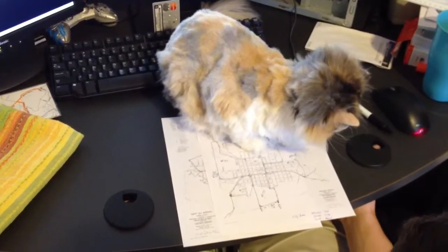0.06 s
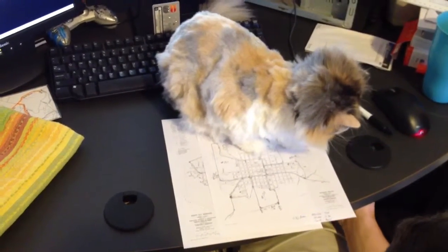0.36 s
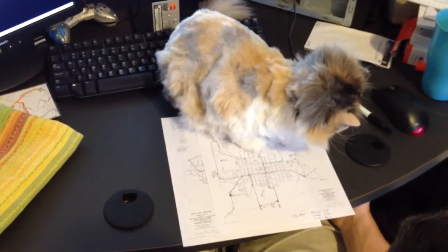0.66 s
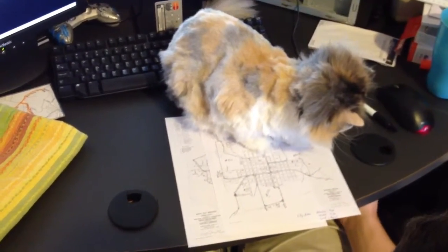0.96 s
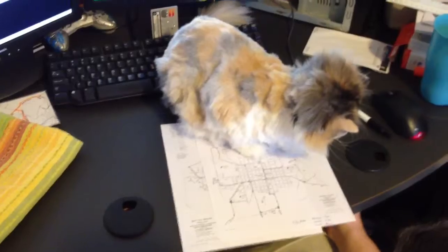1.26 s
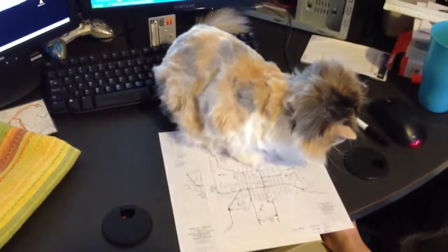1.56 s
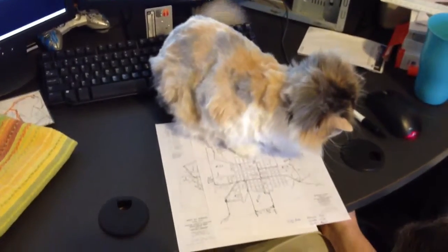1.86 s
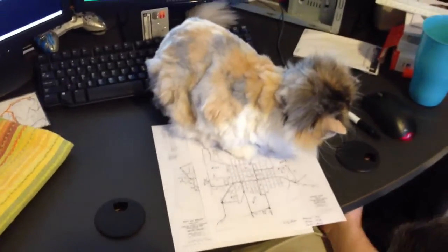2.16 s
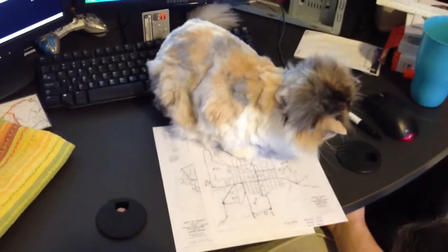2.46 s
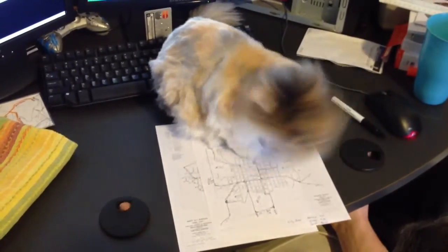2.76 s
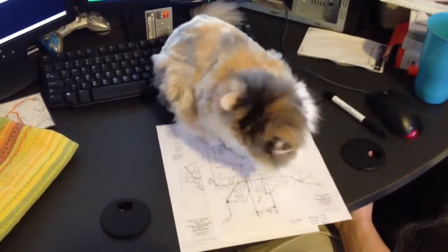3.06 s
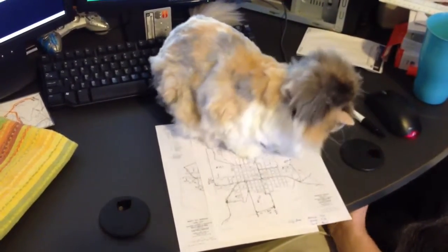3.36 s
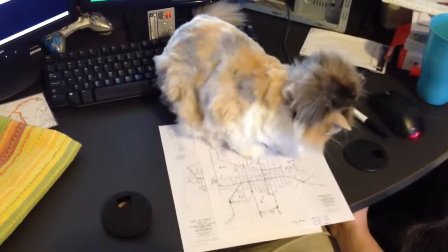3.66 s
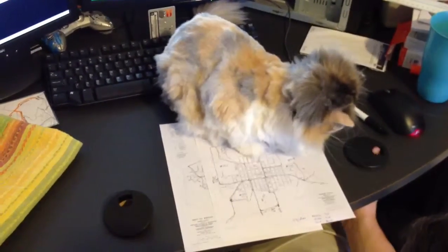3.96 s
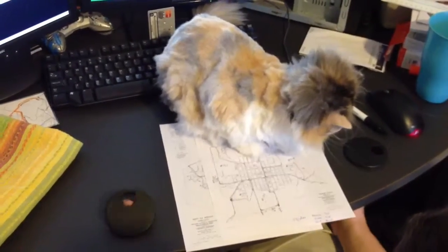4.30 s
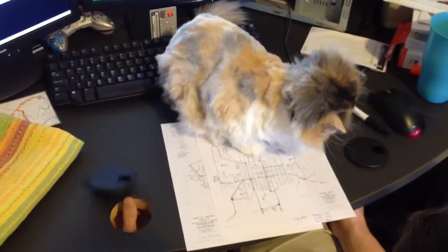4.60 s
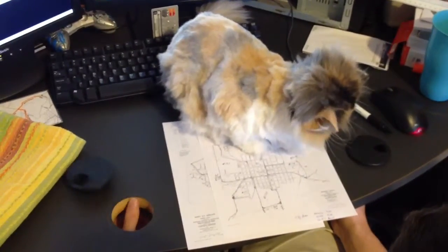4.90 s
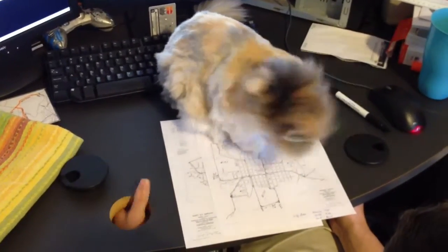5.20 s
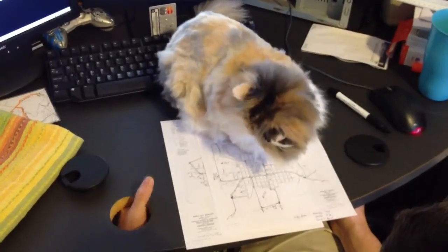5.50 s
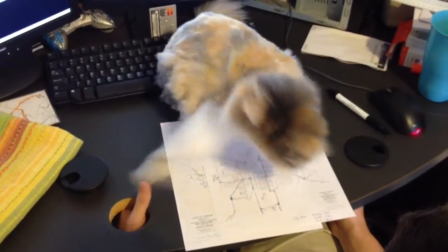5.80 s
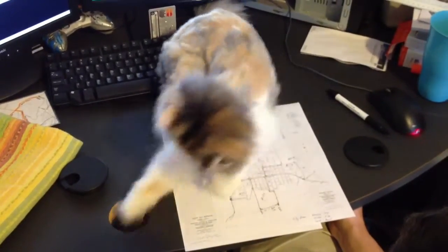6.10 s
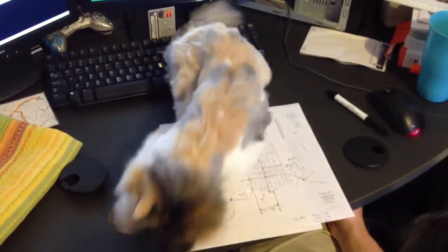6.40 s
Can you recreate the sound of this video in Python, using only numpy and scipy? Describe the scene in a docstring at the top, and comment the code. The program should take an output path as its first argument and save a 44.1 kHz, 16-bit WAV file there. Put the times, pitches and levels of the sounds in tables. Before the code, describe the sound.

In a small room with a faint computer hum, a finger taps plastic cable hole covers from under a desk, making light clicks and dull knocks. A cat's paws rub softly on paper and its claws skid briefly. The taps grow more frequent, then one cover scrapes out of its hole and clatters loudly to rest. Soft paw swipes follow, all picked up by a small microphone nearby.

```python
"""At a desk in a small room, a cat paws at the top and a sheet of paper, teased through the cable holes.
A finger taps the plastic hole covers from below, and each impact excites the modes of cover and desk.
One cover is pushed out: it scrapes by stick-slip friction, tips over and clatters to rest.
Sliding paws and paper give friction noise, claws skid and squeak, and a computer hums and whirs nearby."""
import sys
import numpy as np
from scipy import signal
from scipy.io import wavfile
from scipy.ndimage import uniform_filter1d

SR = 44100
rng = np.random.default_rng(int(sys.argv[2]) if len(sys.argv) > 2 else 0)


def wrap_up_sound(samples):
    """Save the sound to the file named by the first command line argument, as 16-bit audio."""
    columns = np.atleast_2d(samples).T
    # keep every value between -1 and 1, then stretch to whole-number steps
    tamed = np.clip(columns, -1, 1)
    steps = np.round(tamed * 32767).astype(np.int16)
    wavfile.write(sys.argv[1], SR, steps)


N = 284441
CLOCK = np.arange(N) / SR
RING_TIME = np.arange(SR // 4) / SR

# knocks and bounces of the loose cover: start_s, ring_db, upper_modes_re_ring_db, tick_re_ring_db
BOUNCES = [(3.5005, -29.5, -9.5, -1.5), (3.5425, -39.5, -19, -23), (4.2767, -33, -16, -25),
           (4.4103, -35.5, -16, 5.5), (4.6549, -16, -13, -21), (4.661, -21, -18, -18),
           (4.7855, -11, -16.5, -17.5), (4.8962, -11, -1, -4.5), (4.9538, -13.5, -7, -14.5),
           (4.9965, -16, -9.5, -27), (5.0357, -25, -29, -26), (5.0646, -26, -10.5, -21),
           (5.0884, -24, -31, -26)]
# the cover's modes, in close groups: pitch_hz, gain_db, t60_s
COVER_MODES = [(1490, -14.5, .08), (1517.6, 2, 0.081), (1530, -19, 0.2), (1614.5, 5, 0.08),
               (1650, -11, 0.056), (2317, -8.5, 0.079), (3677, 0, 0.068), (3791, 0, 0.064),
               (3848, 7.5, .05), (4120, -3.5, .03), (4720, -21, .25), (6240, -1.5, .03), (7740, 4.5, 0.04),
               (7840, 1, 0.021)]
# a seated cover nudged against its hole: start_s, knock_db, tick_db, pitch_hz, knock_t60_s
NUDGES = [(0.2957, -57, -52.5, 3170, 0.048), (2.1287, -55, -60, 2440, 0.057),
          (2.1826, -49.5, -53.5, 1990, 0.04), (2.222, -52, -52, 1630, 0.048),
          (2.451, -34, -43, 1670, 0.039), (2.7171, -43.5, -47, 1630, 0.048),
          (2.7847, -39.5, -47.5, 1710, 0.072), (2.91, -36.5, -42, 1730, 0.052),
          (2.948, -44.5, -72, 1660, 0.043), (2.9746, -43, -46.5, 1840, 0.048),
          (3.1024, -36, -50, 3050, 0.077), (3.1442, -56, -51.5, 1690, 0.048),
          (3.3245, -45.5, -74, 1600, 0.069), (3.4079, -29.5, -38.5, 1880, 0.048),
          (3.7878, -36, -44.5, 1740, 0.048), (4.1056, -29.5, -36.5, 1860, 0.038),
          (4.261, -32.5, -36, 1770, 0.062), (4.5113, -32.5, -37, 1610, 0.048)]
# dull thuds on the desk, from paw, finger or a dropping cover: start_s, level_db, pitch_hz
DESK_THUDS = [(0.666, -47.5, 1030), (0.72, -39.5, 1390), (2.186, -48.5, 1050), (2.457, -39.5, 1330),
              (2.705, -46.5, 982), (2.862, -46, 1130), (3.324, -48, 1000), (3.5, -35, 1385),
              (4.272, -40.5, 1240), (4.423, -35.5, 1080), (4.656, -33.5, 1428)]
# envelope of the rim dragging out of its hole: time_s, level_db
DRAG_LEVEL = [(4.412, -41), (4.526, -42), (4.562, -55.5), (4.6, -52), (4.648, -42.5), (4.65, -40.5)]
# claws skidding on plastic: peak_s, length_s, level_db
CLAW_SKIDS = [(2.471, 0.0084, -35.5), (2.648, 0.038, -58), (2.715, 0.031, -43), (2.904, 0.0088, -33.5),
              (3.422, .025, -48), (4.619, .008, -52)]
# fur, paws and paper sliding: peak_s, length_s, rub_db, hiss_db
SLIDES = [(0.008, 0.093, -61, -70), (0.702, .08, -67, -61.5), (0.85, .09, -64.5, -66),
          (2.227, 0.078, -58.5, -64.5), (2.34, 0.053, -61, -65), (2.67, 0.088, -64, -69),
          (3.244, 0.078, -60, -65), (3.606, 0.035, -58, -57.5), (3.783, .11, -51, -79),
          (4.15, 0.07, -55.5, -70), (5.793, 0.076, -76, -63), (5.938, 0.081, -54, -63),
          (6.008, 0.2, -60.5, -62), (6.45, 0.089, -55.5, -63.5)]
# pads of paw or finger pressing on the desk: peak_s, length_s, level_db
PRESSES = [(2.148, .05, -62.5), (3.238, .09, -63.5), (3.63, .05, -69), (4.18, 0.14, -56), (4.3, .09, -56),
           (4.44, .02, -46), (6.066, 0.046, -54.5), (6.135, 0.058, -63.5)]

# spectral envelopes: frequency_hz, gain_db
DESK_SPECTRUM = [(60, -10.5), (110, -14), (150, 1.5), (205, 4), (420, 2.5), (700, 0.5), (1100, 0),
                 (1500, -4), (2500, -10), (5000, -49)]  # struck desk top
KNOCK_SPECTRUM = [(300, -23.5), (1000, -11.5), (1400, -7), (1700, 12.5), (2300, -2), (3000, 3), (3450, -13),
                  (4000, -9), (4800, -5), (6000, -11), (12000, -45.5)]  # damped plastic cover
TICK_SPECTRUM = [(1000, -30), (3000, -9), (5200, -5), (6400, 3.5), (7200, 2), (8100, 3), (8800, -6),
                 (10200, -12), (12200, -10), (13600, -13.5), (15500, -19.5)]  # hard contact
RASP_SPECTRUM = [(150, -13.5), (380, -3.5), (600, -2), (900, 4), (1300, -0.5), (2250, 8.5), (2750, -9),
                 (3300, -21), (5000, -24), (5650, -5.5), (6400, -14), (7650, -6.5), (9000, -27)]  # rim on the hole's edge
SKID_SPECTRUM = [(4000, -54), (6500, -21), (7400, -5.5), (8100, -3.5), (8900, -19), (10400, -19.5),
                 (12200, -13.5), (13300, -16.5), (15000, -25)]  # claw on plastic
BUMP_SPECTRUM = [(60, -37), (130, -7.5), (185, -0.5), (280, -9.5), (400, -4), (600, -14), (1500, -37)]  # soft paw
RUB_SPECTRUM = [(150, -4), (450, -12), (800, 5), (1150, -4.5), (1600, 3.5), (1950, -1), (2350, -3),
                (2900, -5), (4000, -11), (8000, -17)]  # grain of a slide
HISS_SPECTRUM = [(1500, -22.5), (3000, -4), (5000, -1), (7500, 8), (9800, -3), (12500, 0), (15500, -17)]  # hiss of a slide
AIR_SPECTRUM = [(40, -4), (95, -12.5), (135, -1), (155, -5.5), (230, 2), (330, -2.5), (900, -6.5),
                (1600, -5.5), (2100, -10.5), (4000, -14), (8000, -18.5), (10200, -24), (15000, -17.5)]  # steady air of the room

# the background noise, which ducks after the loud clatter and slowly recovers: time_s, level_db
BACKGROUND_LEVEL = [(0, -64.5), (4.8, -63.5), (5.3, -65.5), (5.75, -67), (6.45, -64.5)]
# the computer's tones: pitch_hz, level_db
HUM_TONES = [(119.3, -73.5), (240, -85.5), (501, -81.5), (753, -80.5), (890, -82), (1565, -83),
             (8640, -100)]
# envelope of its electronic whine: time_s, level_db
WHINE_LEVEL = [(0, -97), (1.3, -95), (1.6, -103), (6.45, -99)]
# early reflections from nearby things: delay_s, gain
REFLECTIONS = [(.0062, 0.077), (.0093, 0.13), (0.0125, .12), (0.0313, 0.13)]
# reverberation time of the room: frequency_hz, t60_s
ROOM_DECAY = [(150, 0.84), (600, 0.76), (1600, 0.27), (4000, 0.34), (7500, 0.27), (14000, 0.44)]


def clatter():
    """Impact excitation: the loose cover rings at each bounce, and again as its far side lands."""
    out = np.zeros(N)
    for start_s, ring_db, upper_db, tick_db in BOUNCES:
        ring = at_energy(cover_ring(upper_db), ring_db, over_s=.0029)
        far_side_s = .026 * (1 + rng.random()) / 2
        add(ring, far_side_s, at_energy(cover_ring(upper_db), ring_db - 16.5, over_s=.00092))
        tick = at_energy(burst(TICK_SPECTRUM, t60_s=.016, rise_s=.0002), ring_db + tick_db, over_s=.002)
        knock = at_energy(burst(KNOCK_SPECTRUM, t60_s=.072, rise_s=.00071), ring_db - 10.5, over_s=.0022)
        # the light cover hardly moves the desk's low modes
        desk = coloured(burst(DESK_SPECTRUM, t60_s=.22, rise_s=.004), [(300, -14), (1000, 2)])
        thud = at_energy(desk, ring_db - 18, over_s=.0025)
        add(out, start_s, room(ring + tick + knock + thud, wet_db=-7))
    return out


def cover_ring(upper_db):
    """Modal superposition: each contact detunes the modes slightly; upper_db tilts their balance."""
    lowest_hz, upper_hz = COVER_MODES[0][0], 3800
    ring = np.zeros(len(RING_TIME))
    for hz, db, t60_s in COVER_MODES:
        height = np.log(hz / lowest_hz) / np.log(upper_hz / lowest_hz)
        detuned_hz = hz * (1 + .0054 * rng.standard_normal())
        ring += gain_of(db + upper_db * height) * mode(detuned_hz, t60_s)
    attack = 1 - np.exp(-RING_TIME / .0032)
    contact_db = 9.5 * np.exp(-(RING_TIME / .011) ** 2)  # stronger until the rim settles
    return ring * attack * gain_of(contact_db)


def clicks():
    """Damped vibration: a seated cover knocks against its hole, rings weakly and rebounds once."""
    out = np.zeros(N)
    for start_s, knock_db, tick_db, hz, t60_s in NUDGES:
        rebound_s = .017 * (.5 + rng.random())
        for delay_s, touch_db in [(0, 0), (rebound_s, -15.5)]:
            note = gain_of(-2) * unit_rms(mode(hz, t60_s / 2))
            plastic = unit_rms(burst(KNOCK_SPECTRUM, t60_s, rise_s=.0003))
            knock = at_energy(plastic + note, knock_db, over_s=.0011)
            ring = at_energy(cover_ring(upper_db=-7.5), knock_db - 12.5, over_s=.00093)
            tick = at_energy(burst(TICK_SPECTRUM, t60_s=.024, rise_s=.00015), tick_db, over_s=.0023)
            thud = at_energy(burst(DESK_SPECTRUM, t60_s=.2, rise_s=.0059), knock_db - 12, over_s=.00059)
            add(out, start_s + delay_s, gain_of(touch_db) * room(thud + knock + ring + tick, wet_db=-4.5))
    return out


def thuds():
    """Plate vibration: a dull impact excites the desk top, with a woody note, and jolts the covers."""
    out = np.zeros(N)
    for start_s, db, hz in DESK_THUDS:
        thud = at_energy(burst(DESK_SPECTRUM, t60_s=.14, rise_s=.0017), db, over_s=.004)
        note = at_energy(mode(hz, t60_s=.033), db - 3, over_s=.0018)
        knock = at_energy(burst(KNOCK_SPECTRUM, t60_s=.1, rise_s=.0005), db - 4, over_s=.0016)
        tick = at_energy(burst(TICK_SPECTRUM, t60_s=.024, rise_s=.0003), db - 8, over_s=.002)
        add(out, start_s, room(thud + note + knock + tick, wet_db=-6.5))
    return out


def rim_drag():
    """Stick-slip friction: the rim rasps and catches on the hole's edge, driving the cover's modes."""
    slips = grains(per_s=950, spread_db=-4.5)
    cover_response = sum(gain_of(db) * mode(hz, t60_s) for hz, db, t60_s in COVER_MODES)
    ring = signal.oaconvolve(slips, cover_response)[:N]
    ring = gain_of(4) * texture(ring, [(1600, 4), (3800, -14.5), (8000, -13.5)])
    catches = gain_of(-16.5) * texture(grains(per_s=70, spread_db=-1.5), TICK_SPECTRUM)
    rasp = texture(slips, RASP_SPECTRUM)
    level = gain_of(np.interp(CLOCK, *np.transpose(DRAG_LEVEL), left=-120, right=-120))
    return room(level * unit_rms(ring + catches + rasp), wet_db=-7)[:N]


def claw_skids():
    """Frictional chatter: claw tips skip over hard plastic in brief, high, thin runs of clicks."""
    chatter = texture(grains(per_s=2100, spread_db=4), SKID_SPECTRUM)
    return room(swells(CLAW_SKIDS) * chatter, wet_db=-15.5)[:N]


def paw_strokes():
    """Sliding friction: paws and paper rub and hiss over the soft bump of the cat's weight."""
    rub_level = swells((peak_s, length_s, db) for peak_s, length_s, db, _ in SLIDES)
    hiss_level = swells((peak_s, length_s, db) for peak_s, length_s, _, db in SLIDES)
    bump_level = gain_of(-6) * rub_level + swells(PRESSES)
    bump = bump_level * texture(rng.standard_normal(N), BUMP_SPECTRUM)
    rub = rub_level * texture(grains(per_s=3300, spread_db=-.5), RUB_SPECTRUM)
    hiss = hiss_level * texture(rng.standard_normal(N), HISS_SPECTRUM)
    return room(bump + rub + hiss, wet_db=-14.5)[:N]


def claw_squeak():
    """Stick-slip oscillation: a claw squeaks once at a high, unsteady pitch."""
    pitch_hz = 12170 * (1 + .034 * unit_rms(uniform_filter1d(rng.standard_normal(N), SR // 1000)))
    return gain_of(-56) * swell(peak_s=6.14, length_s=.024) * tone(pitch_hz)


def computer():
    """Broadband and tonal noise: fan air, faint wavering tones and a thin whine that drops in level."""
    air = texture(rng.standard_normal(N), AIR_SPECTRUM)
    air *= gain_of(np.interp(CLOCK, *np.transpose(BACKGROUND_LEVEL)))
    hum = np.zeros(N)
    for hz, db in HUM_TONES:
        drift = uniform_filter1d(rng.standard_normal(N), SR // 8)
        waver = unit_rms(uniform_filter1d(drift, SR // 8))
        hum += gain_of(db) * np.sqrt(2) * tone(hz * (1 + .001 * waver))
    whine_hz = 12963
    whine = np.sqrt(2) * np.sin(2 * np.pi * whine_hz * CLOCK)
    whine *= gain_of(np.interp(CLOCK, *np.transpose(WHINE_LEVEL)))
    return air + hum + whine


def room(x, wet_db):
    """Reverberation: early reflections and a diffuse tail that differs for every spot on the desk."""
    hz, time_s, spectrum = signal.stft(rng.standard_normal(SR // 2), SR, nperseg=256)
    decay = gain_of(-60 * time_s / at_frequency(ROOM_DECAY, hz)[:, None])
    tail = signal.istft(spectrum * decay, SR)[1]
    tail *= 1 - np.exp(-(np.arange(len(tail)) / SR / .0025) ** 2)
    response = gain_of(wet_db) * tail / np.linalg.norm(tail)
    response[0] = 1  # direct sound
    for delay_s, gain in REFLECTIONS:
        add(response, delay_s, np.array([gain]))
    return signal.fftconvolve(x, response)


def mode(hz, t60_s):
    """Free vibration of one damped mode."""
    return gain_of(-60 * RING_TIME / t60_s) * np.sin(2 * np.pi * hz * RING_TIME)


def burst(spectrum, t60_s, rise_s):
    """Modal overlap: dense modes merge into noise that rises and decays after one contact."""
    envelope = gain_of(-60 * RING_TIME / t60_s) * (1 - np.exp(-RING_TIME / rise_s))
    return coloured(envelope * rng.choice([-1., 1.], len(envelope)), spectrum)


def grains(per_s, spread_db):
    """Stick-slip friction as a random train of uneven impulses."""
    size = gain_of(spread_db * np.minimum(rng.exponential(1, N), 4))
    return size * rng.standard_normal(N) * (rng.random(N) < per_s / SR)


def tone(hz):
    """A sinusoid whose phase is the integral of its frequency."""
    return np.sin(2 * np.pi * np.cumsum(hz) / SR)


def swell(peak_s, length_s, rise_share=.42):
    """Speed of a stroke: a skewed Gaussian that gathers and fades."""
    share = np.where(CLOCK < peak_s, rise_share, 1 - rise_share)
    return np.exp(-((CLOCK - peak_s) / (share * length_s)) ** 2)


def swells(strokes):
    """Summed amplitude envelope of several strokes."""
    return sum(gain_of(db) * swell(peak_s, length_s) for peak_s, length_s, db in strokes)


def coloured(x, spectrum):
    """Minimum-phase filtering: causal, so attacks stay sharp."""
    hz = abs(np.fft.fftfreq(4096, 1 / SR))
    log_gain = np.log(gain_of(at_frequency(spectrum, hz)))
    taps = np.fft.ifft(np.exp(np.conj(signal.hilbert(log_gain)))).real
    return signal.oaconvolve(x, taps[:len(taps) // 2])[:len(x)]


def texture(excitation, spectrum):
    """Source and filter: a shaped excitation at unit rms."""
    return unit_rms(coloured(excitation, spectrum))


def at_frequency(table, hz):
    """Interpolation along a log-frequency axis."""
    table_hz, values = np.transpose(table)
    return np.interp(np.log(hz + 1), np.log(table_hz + 1), values)


def at_energy(x, db, over_s):
    """Equal energy: scales a transient to match this level held for over_s."""
    return gain_of(db) * x / np.sqrt(np.sum(x ** 2) / (over_s * SR) + 1e-20)


def unit_rms(x):
    """Normalisation to an rms of one."""
    return x / np.sqrt(np.mean(x ** 2) + 1e-20)


def gain_of(db):
    """Decibels to amplitude."""
    return 10 ** (np.asarray(db) / 20)


def add(mix, start_s, sound):
    """Superposes a sound on the mix at start_s."""
    part = mix[max(round(start_s * SR), 0):][:len(sound)]
    part += sound[:len(part)]


def scene():
    """Superposition of all sources at one listening point."""
    impacts = clicks() + thuds() + clatter()
    friction = paw_strokes() + claw_skids() + claw_squeak() + rim_drag()
    return (impacts + friction + computer())[None]


def record(dry):
    """Band limiting: a small microphone cuts the bass and the highest treble."""
    bass_cut = signal.butter(N=4, Wn=108, btype="high", fs=SR, output="sos")
    treble_cut = signal.firwin(255, cutoff=15600, window=("kaiser", 9), fs=SR)
    return signal.oaconvolve(signal.sosfilt(bass_cut, dry), treble_cut[None], "same")


dry = scene()
out = record(dry)
wrap_up_sound(out)
```